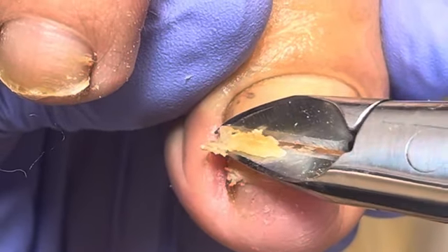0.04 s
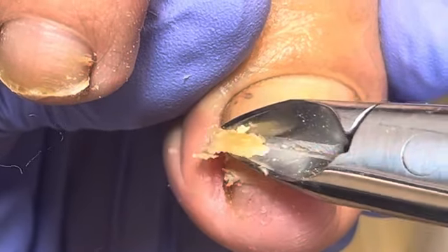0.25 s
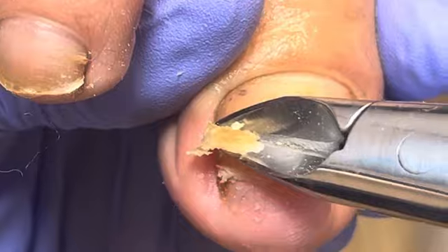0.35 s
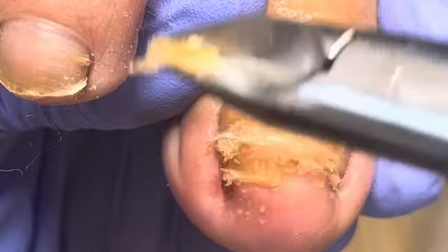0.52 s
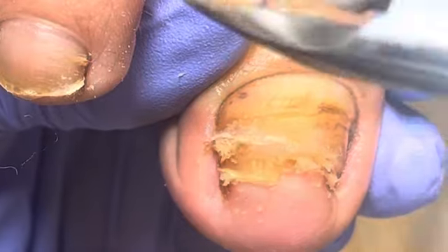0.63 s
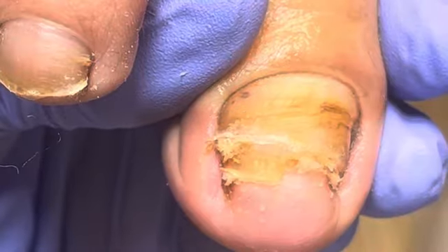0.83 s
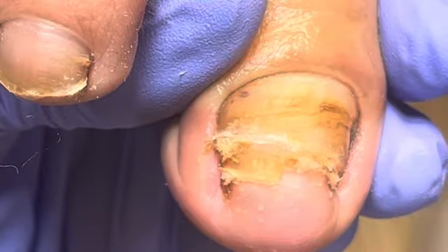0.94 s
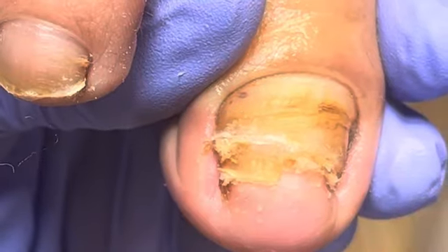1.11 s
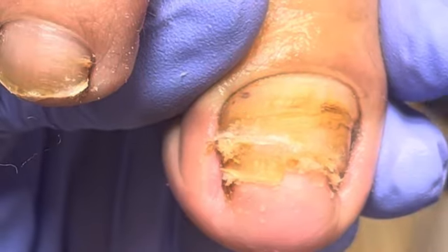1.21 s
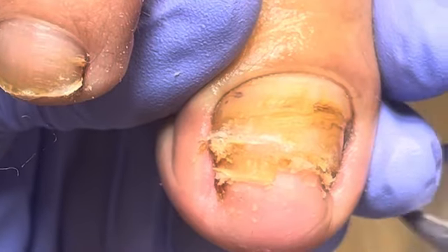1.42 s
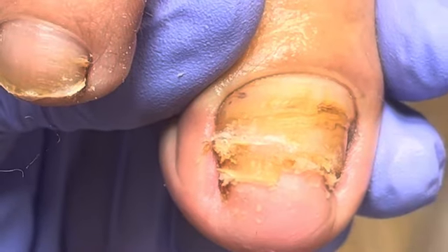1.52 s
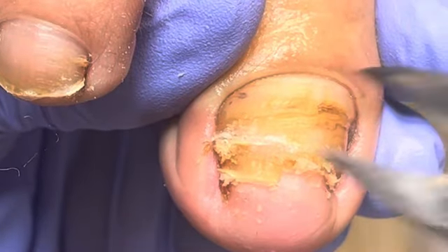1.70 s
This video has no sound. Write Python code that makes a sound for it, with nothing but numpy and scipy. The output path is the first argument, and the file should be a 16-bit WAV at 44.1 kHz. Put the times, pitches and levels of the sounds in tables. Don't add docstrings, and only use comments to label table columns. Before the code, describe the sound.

Quiet small room, close stereo phone microphone, treble ending near 12 kHz. Faint low ventilation rumble, fan hum and thin hiss run throughout. At 0.2 s a nail nipper snaps once through a thick nail: a very loud, bright, dry crack of a few milliseconds, with a small falling thud, faint metallic ring and brief room tail. Barely audible glove rustles follow, slightly clearer around 1.4-1.5 s.

```python
import sys
import numpy as np
from scipy import signal
from scipy.fft import rfft, irfft
from scipy.io import wavfile
from scipy.ndimage import uniform_filter1d

SR = 44100
rng = np.random.default_rng(int(sys.argv[2]) if len(sys.argv) > 2 else 0)


def to_linear_factor(level_db):
    exponent = np.asarray(level_db, float) / 20
    return 10 ** exponent


def generate_wav(signal):
    frames = np.transpose(np.atleast_2d(signal))
    scaled = np.clip(frames, -1, 1) * 32767
    pcm = np.round(scaled).astype(np.int16)
    wavfile.write(sys.argv[1], SR, pcm)


N = 77175
T = np.arange(N) / SR
HZ = np.maximum(np.arange(N // 2 + 1) * SR / N, 1)

# [t/s, level/dB]
CRACKS = [
    (.19958, -9.6),
    (.19989, .6),
    (.20014, 1.4),
    (.2009, -13.7),
]
SNAP_S = CRACKS[2][0]
# [f/Hz, spectral density level/dB]
DIFFUSE_COLOUR = [(1200, -17), (1850, -4), (2800, -11), (4300, -4), (6800, -6), (8600, -8), (9300, -22),
                  (12100, -30)]
# [t/s, draught level/dB, hiss level/dB, fan throb level/dB]
AIR_FLOW = [(0, -67, -67.5, -52), (.3, -67, -68.5, -55), (.39, -68, -69, -51), (.5, -69, -68.5, -58),
            (.58, -67, -66, -56), (.68, -67, -68, -56), (.76, -65, -65.5, -52), (.88, -66, -70, -55),
            (1.0, -66, -68, -52), (1.16, -67, -67, -52), (1.22, -68, -67, -57), (1.32, -70, -71, -56),
            (1.46, -66, -66, -56), (1.55, -65, -67.5, -53), (1.75, -64, -67, -52)]


def level(x, db):
    return x * to_linear_factor(db) / np.sqrt(np.mean(x ** 2))


def noise(colour):
    f, db = np.array(colour).T
    gain = to_linear_factor(np.interp(np.log(HZ), np.log(f), db)) * np.minimum(HZ / f[0], 1) ** 2
    return level(irfft(rfft(rng.standard_normal(N)) * gain, N), 0)


def walk(rate):
    hold = int(SR / rate)
    steps = np.repeat(rng.standard_normal(N // hold + 1), hold)
    return 1.26 * uniform_filter1d(uniform_filter1d(steps, hold), hold)[:N]


def alive(x, column):
    draught_hz, flicker_db = 200, 3.3
    spectrum, flow = rfft(x), np.array(AIR_FLOW).T
    swell = np.interp(T, flow[0], flow[column] - flow[column].mean())
    half_octave = 2 * np.log2(HZ)
    out = 0
    for band in range(8, 29):
        share = np.clip(1 - abs(half_octave - band), 0, 1)
        follow = 1 / (1 + (draught_hz / 2 ** (band / 2)) ** 2)
        out = out + irfft(spectrum * share, N) * to_linear_factor(follow * swell + flicker_db * walk(8.1))
    return out


def fade(start, t60):
    return (T >= start) * np.exp(-np.log(1000) * np.maximum(T - start, 0) / t60)


def swell_and_die(start, t60, rise):
    return fade(start, t60) * (1 - fade(start, rise))


def ring(start, hz, db, t60, rise, sign):
    return sign * to_linear_factor(db) * swell_and_die(start, t60, rise) * np.sin(2 * np.pi * hz * (T - start))


def rumble():
    rumble_db, alike_hz = -55, 350
    # [f/Hz, spectral density level/dB]
    rumble_colour = [(30, -23), (45, -3), (60, 4.5), (120, -3), (300, -14), (600, -26), (2000, -41),
                     (4000, -60)]
    # [f/Hz, bandwidth/Hz, level/dB]
    fan_hum = [(57.6, 3.9, -57), (76, 16, -60), (109.5, 8, -61)]
    apart = HZ ** 2 / (HZ ** 2 + alike_hz ** 2)
    mid = alive(noise(rumble_colour), column=1)
    side = irfft(rfft(alive(noise(rumble_colour), column=1)) * apart, N)
    hum = 0
    for hz, width, db in fan_hum:
        resonance = 1 / (1 + (2 * (HZ - hz) / width) ** 2)
        hum = hum + level(irfft(rfft(rng.standard_normal(N)) * resonance, N), db)
    flow = np.array(AIR_FLOW).T
    throb = to_linear_factor(np.interp(T, flow[0], flow[3] - flow[3].mean()))
    return to_linear_factor(rumble_db) * (mid + side * np.array([[1], [-1]])) + throb * hum


def hiss():
    hiss_db, apart_db, apart_top_hz = -66.5, -7, 5500
    # [f/Hz, spectral density level/dB]
    hiss_colour = [(900, -24), (2400, -20), (3100, -4), (3800, 0.5), (5200, 0.5), (6000, -19), (11600, -26),
                   (12100, -40)]
    shared = to_linear_factor(hiss_db) * alive(noise(hiss_colour), column=2)
    apart = [irfft(rfft(noise(hiss_colour)) * (HZ < apart_top_hz), N) for _ in range(2)]
    return shared, to_linear_factor(hiss_db + apart_db) * np.array(apart)


def gloves():
    sharpness, grain_db = 1.1, 3.0
    # [t/s, length/s, level/dB, rubbing f/Hz, hiss level/dB]
    rustles = [(.04, .15, -73, 2100, -16), (.14, .07, -72, 1000, -16), (.57, .1, -70, 1050, -10),
               (.62, .06, -72, 2100, 1), (.77, .08, -72, 1050, -12), (.885, .16, -77, 2000, 6),
               (1.02, .12, -79, 1300, 0), (1.274, .03, -78, 1700, 4), (1.385, .06, -67, 1300, 0),
               (1.42, .12, -68, 950, -3), (1.455, .05, -65, 1700, 1), (1.51, .17, -64, 480, -17),
               (1.66, .12, -78, 700, -4)]
    # [f/Hz, spectral density level/dB]
    glove_colour = [(400, 4.5), (1000, 5.5), (2000, 8), (2700, -1), (4800, 3), (8000, 0), (11500, -3),
                    (12100, -25)]
    rub = rfft(noise(glove_colour))
    treble = HZ ** 2 / (HZ ** 2 + 3500. ** 2)
    swells = 0
    for start, length, db, hz, hiss_db in rustles:
        resonance = 1 / (1 + (sharpness * (HZ / hz - hz / HZ)) ** 2)
        tone = irfft(rub * (resonance + to_linear_factor(hiss_db) * treble), N)
        swells = swells + to_linear_factor(db) * np.exp(-(2 * (T - start) / length) ** 2) * tone
    return swells * to_linear_factor(grain_db * walk(120.))


def room():
    return to_linear_factor(-51) * swell_and_die(SNAP_S, t60=.62, rise=.02) * noise(DIFFUSE_COLOUR)


def thud():
    thud_db, from_hz, to_hz, fall_s = -23.5, 485, 50, .0075
    t60_s, rise_s = .045, .02
    fall = np.exp(-np.maximum(T - SNAP_S, 0) / fall_s)
    hz = (T >= SNAP_S) * (to_hz + (from_hz - to_hz) * fall)
    envelope = fade(SNAP_S, t60_s) * (1 - fade(SNAP_S, rise_s)) ** 2
    return to_linear_factor(thud_db) * envelope * np.sin(2 * np.pi * np.cumsum(hz) / SR)


def snap():
    # [f/Hz, level/dB, t60/s, build-up/s]
    jaw_modes = [(1200, -37, .008, .001), (560, -41, .010, .003), (1525, -35, .0061, .00115),
                 (1859, -15.1, .0091, .00044), (2409, -14.8, .0025, .00011), (3218, -30.6, .0034, .00112),
                 (4431, 9.3, .0037, .00936), (4420, -3.9, .0042, .00148), (6150, -6, .007, .00347),
                 (7217, -38.9, .0191, .00043), (8313, -7.2, .0029, .00472), (9450, -8, .0045, .00605),
                 (10300, -11, .0018, .00005), (11500, -27, .003, .00025)]
    # [delay/s, level/dB]
    near_echoes = [(.0036, -23), (.0062, -31), (.0093, -29), (.0125, -35), (.017, -39)]
    # [f/Hz, level/dB, t60/s]
    handle_modes = [(1780, -60, .25), (1980, -62, .25), (3036, -60, .09), (4172, -58, .35), (4436, -58, .2),
                    (5055, -64, .12), (6640, -64, .31), (6746, -64, .3), (7100, -58, .2), (7779, -66, .29),
                    (8366, -57, .2), (11274, -70, .2)]
    jaws = 0
    for start, hit_db in CRACKS:
        for k, (hz, db, t60, rise) in enumerate(jaw_modes):
            jaws = jaws + ring(start, hz, hit_db + db, t60, rise, (-1) ** k)
    echoes = 0
    for k, (late, db) in enumerate(near_echoes):
        echoes = echoes + (-1) ** k * to_linear_factor(db) * np.roll(jaws, int(late * SR))
    handles = sum(ring(SNAP_S, hz, db, t60, .02, 1) for hz, db, t60 in handle_modes)
    scattered = to_linear_factor(-32) * swell_and_die(SNAP_S, t60=.04, rise=.02) * noise(DIFFUSE_COLOUR)
    return jaws + echoes + handles + scattered


def two_ports(close, far):
    thud_lag_rad = -.3
    # [f/Hz, level/dB]
    port_shadow = [(4400, 0), (5300, 4), (6600, 6), (8200, 0), (9700, 1), (10050, -10), (10700, -10),
                   (11200, 0)]
    # [f/Hz, phase/rad]
    port_lead = [(0, 0), (1640, -.4), (2580, 2.2), (3790, .75), (4910, 1.3), (5510, 2.9), (6450, 3.45),
                 (7000, 4.9), (7700, 6.3), (8700, 6.9), (9400, 8.9), (10800, 9.7), (11800, 12.6),
                 (13000, 12.6)]
    shadow_hz, shadow_db = np.array(port_shadow).T
    shade = to_linear_factor(np.interp(np.log(HZ), np.log(shadow_hz), shadow_db))
    shade = shade * np.exp(-1j * thud_lag_rad / (1 + (HZ / 900) ** 4))
    lead_hz, lead_rad = np.array(port_lead).T
    lag = np.exp(-1j * np.interp(HZ, lead_hz, lead_rad))
    right = irfft((rfft(close) * shade + rfft(far)) * lag, N)
    return np.array([close + far, right])


def scene():
    background = rumble()
    shared_hiss, apart_hiss = hiss()
    far = room() + gloves() + shared_hiss
    close = thud() + snap()
    return two_ports(close, far) + apart_hiss + background


def band_limit(x):
    return signal.sosfilt(signal.butter(12, 13450, fs=SR, output="sos"), x)


def record(dry):
    low_pass = signal.ellip(8, .2, 60, 12100, fs=SR, output="sos")
    cut = signal.sosfilt(low_pass, dry)
    return band_limit(cut)


dry = scene()
out = record(dry)
generate_wav(out)
```